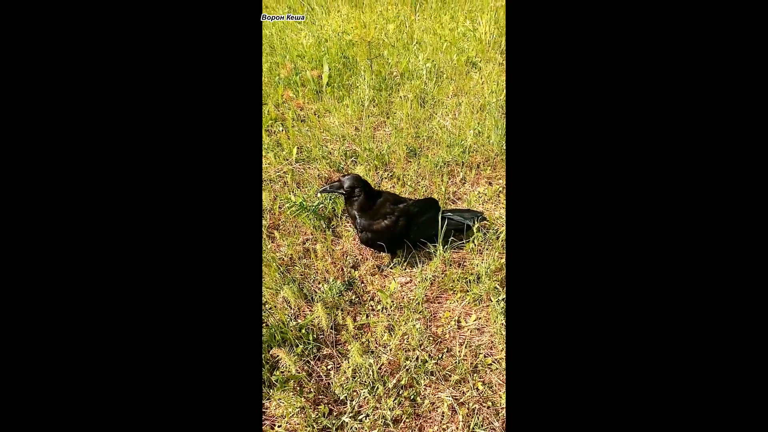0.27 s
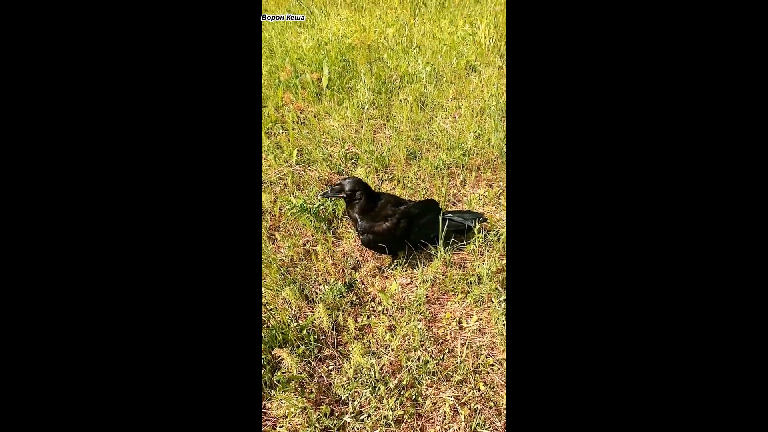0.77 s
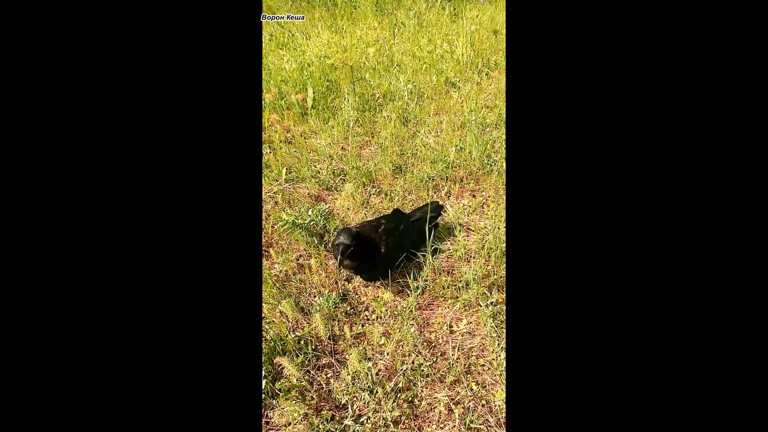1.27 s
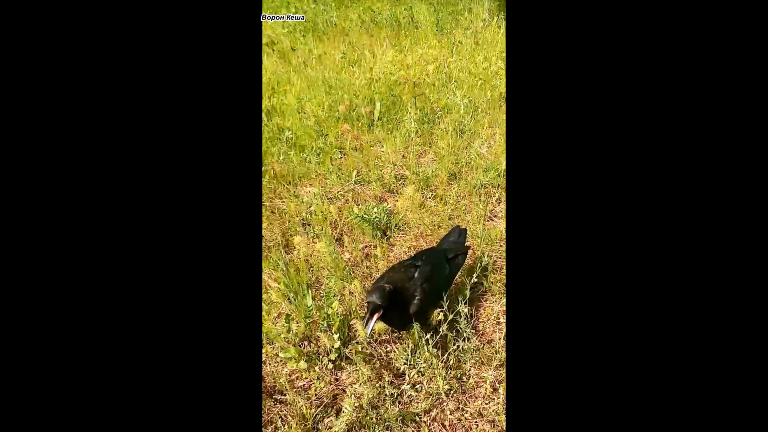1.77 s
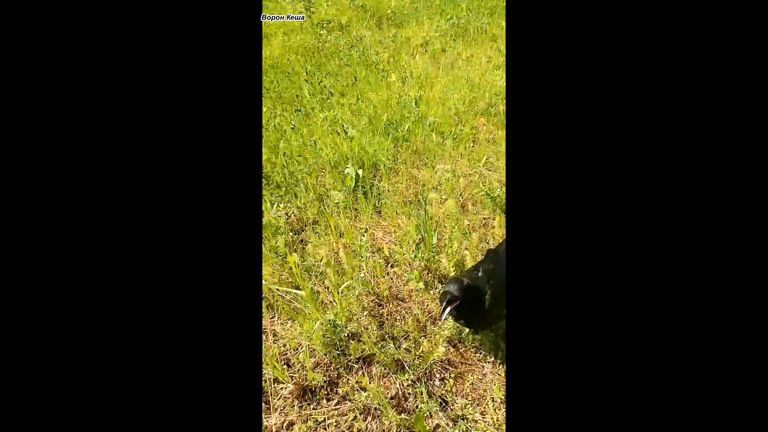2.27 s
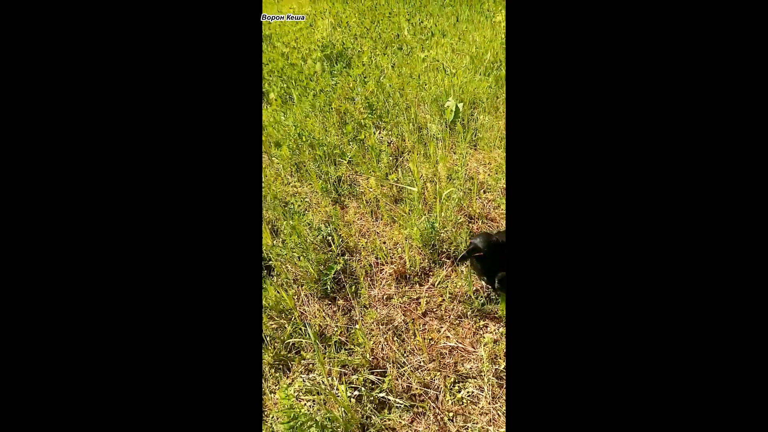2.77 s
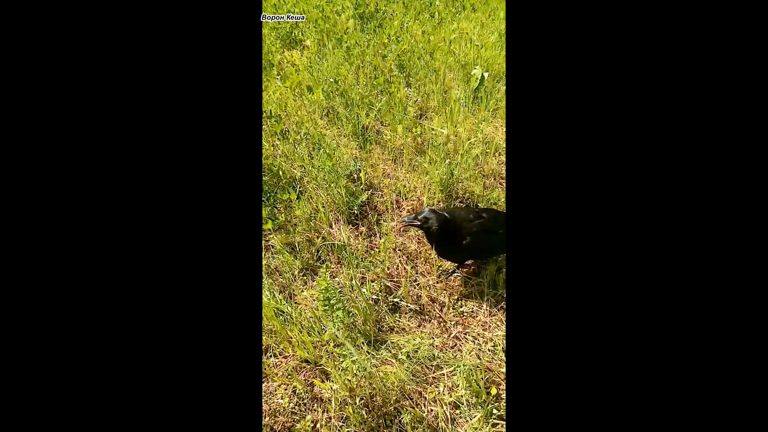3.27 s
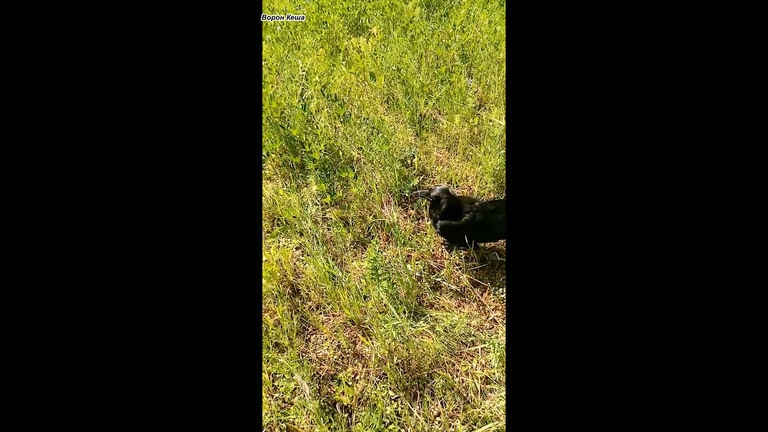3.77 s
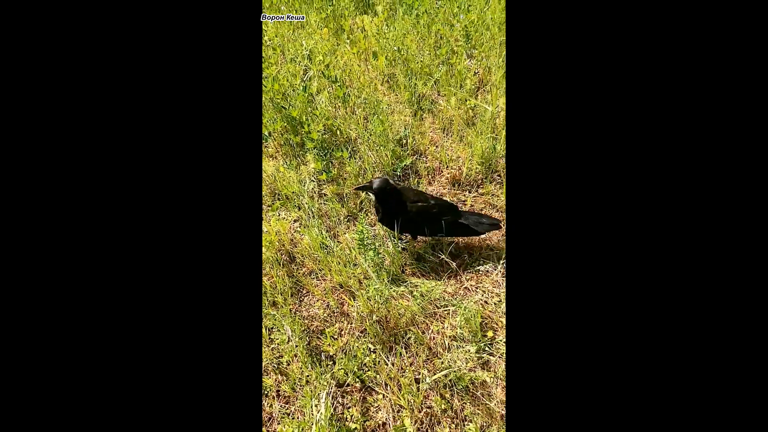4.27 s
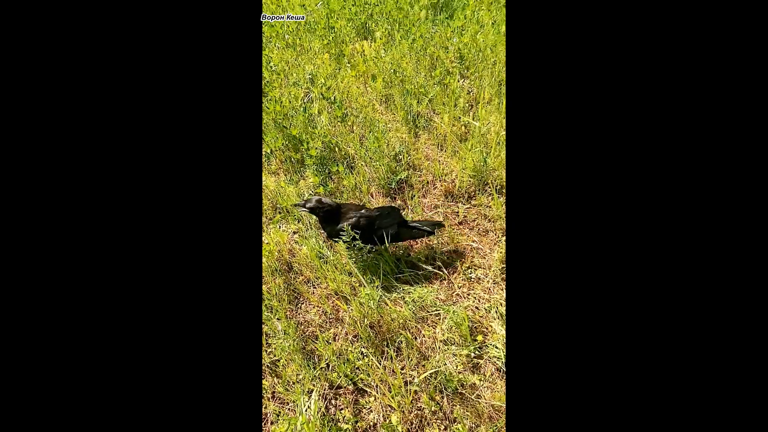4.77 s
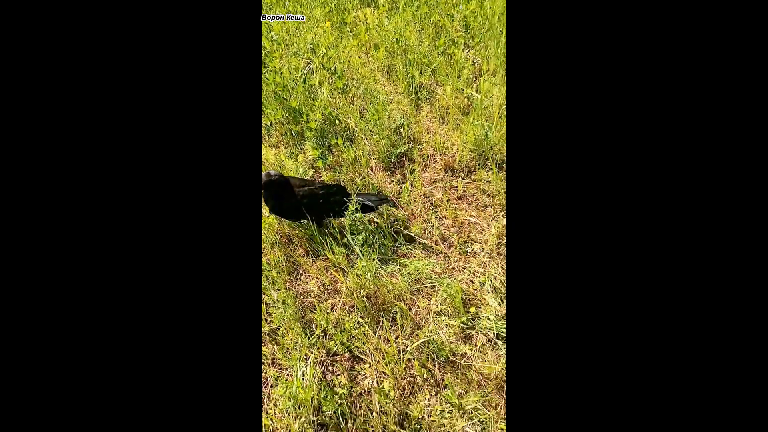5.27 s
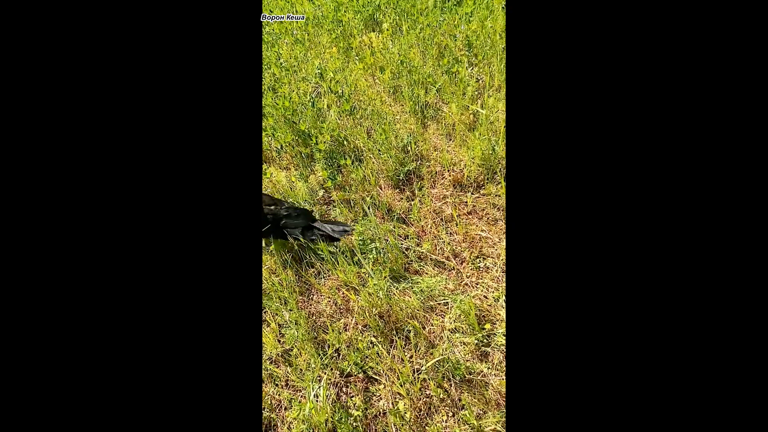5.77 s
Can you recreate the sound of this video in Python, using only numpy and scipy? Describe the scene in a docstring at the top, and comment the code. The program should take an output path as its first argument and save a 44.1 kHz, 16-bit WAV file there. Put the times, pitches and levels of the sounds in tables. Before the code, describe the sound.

A raven close to a small stereo microphone, mostly to the right, caws six times: four harsh calls at fairly even spacing, a longer gap, then a fifth and a final one. Each is a short, rough, fluttering tone that drops at the end. Dry grass hisses faintly between, stalks snap before the fifth call, and a distant small bird whistles thinly over quiet open air.

```python
"""A raven caws six times on a grassy clearing, close to a small stereo microphone and mostly to its right.
Each caw is a tone near 750 Hz that flutters about 60 times a second under a hoarse rasp and sags at its end.
Ground and grass scatter it, a near surface echoes it and the woods ring faintly, as decaying noise.
Dry grass hisses as shaped noise and snaps in short bright bursts; a small bird far off whistles as sines.
Behind them lie a low outdoor rumble and thin air, both of filtered noise."""
import sys
import numpy as np
from scipy import signal
from scipy.fft import rfft, irfft, next_fast_len
from scipy.io import wavfile
from scipy.ndimage import uniform_filter1d

SR = 44100
rng = np.random.default_rng(int(sys.argv[2]) if len(sys.argv) > 2 else 0)


def int16_out(signal):
    """Quantize to a 16-bit WAV file."""
    q = np.round(np.clip(np.atleast_2d(signal).T, -1, 1) * 32767)
    wavfile.write(sys.argv[1], SR, q.astype(np.int16))


N = 265437  # length in samples

# The six caws. Each row: start in seconds, length in seconds, time to the top of the pitch arch in seconds,
# release in seconds, top pitch in Hz, caw level in dB, fundamental and rasp relative to it in dB,
# roughness (0-1) after the attack and at the top, flutter strength as a factor,
# time before the end at which the voice breaks up in seconds.
CAWS = [(.613, 0.33, 0.24, 0.056, 750.7, -21.5, -5.5, -0.84, 0.69, 0.41, 1.1, .028),
        (1.368, 0.29, .19, 0.055, 776.3, -18.5, -12, -5, 0.76, 0.24, 1.05, 0.025),
        (2.1, 0.28, .15, 0.074, 758, -25, -8, 3.5, 0.68, 0.42, .85, 0.032),
        (2.772, 0.28, 0.17, .076, 766.4, -23.5, -8.5, 1.5, .92, 0.25, 1, 0.071),
        (4.423, 0.27, .13, 0.084, 746, -23.5, -7.5, -4.5, 0.92, .36, 1.5, 0.067),
        (5.87, 0.25, 0.15, .07, 733, -26, -5, -6, .85, .55, 0.94, 0.057)]
# Their flutter. Each row: time of a throb's crest in seconds, throbs per second at the start, middle and end,
# pitch swing as a factor, throb of the second harmonic in dB at full drive.
FLUTTERS = [(.640, 54.7, 67.2, 58, 0.067, 1), (1.397, 56.3, 62.9, 42.3, 0.098, 3),
            (2.133, 43.6, 63.13, 56, 0.17, 1.5), (2.805, 53.46, 63.8, 62.35, 0.12, 2),
            (4.451, 46.15, 63.83, 46.7, 0.086, 5), (5.896, 54.2, 60.15, 51.1, 0.087, 3)]
# How each caw meets the microphone. Each row: tilt of the rasp above 2 kHz in dB per octave, left relative
# to right in dB for the fundamental, the upper tones and the rasp, lag of the right port in ms.
POSES = [(1.5, -5, -2.5, -9, 0.986), (1.5, -3, -11.5, -8, 0.98), (2.5, -6, -6.5, -11, 0.898),
         (1.5, -6.5, -3.5, -10.5, 0.902), (-4.5, -6, -1, -8.5, 1.032), (-4, -3, 1.5, -8, 1.1)]
# Resonances of throat and open beak, one list a caw. Each entry: centre in Hz, boost in dB.
BEAKS = [
    [(1250, 14), (2200, 6), (2800, 11.5), (4300, 7), (4900, 9), (6650, 13.5)],
    [(1250, 9), (2250, 5.5), (2900, 6), (4450, 7), (6550, 8.5)],
    [(1620, 5.5), (2000, 8), (2750, 11), (3550, -12.5), (4000, 12), (4400, -0.5), (4850, 9.5)],
    [(1700, 12.5), (2870, 7), (3650, -1), (4300, 6), (4750, 7.5)],
    [(1900, -23), (3000, 6), (4250, 6.5), (6700, 1.5), (7800, 8.5)],
    [(2720, 10.5), (3100, 4.5), (4250, 4)],
]


def raven():
    """Six pushes of air through the syrinx, heard directly and by way of the clearing."""
    voice = np.zeros((2, N))
    for row, flutter, pose, beak in zip(CAWS, FLUTTERS, POSES, BEAKS):
        add(voice, *caw(row, flutter, pose, beak))
    return clearing(ports(voice))


# Spectrum of the rasp before tilt and beak. Each row: frequency in Hz, relative level in dB.
THROAT = [(250, -45.5), (500, -37.5), (700, -9.5), (1000, -23), (1400, -6.5), (1850, -1), (2250, 0.5),
          (2900, 0), (3500, 0), (4400, 1.5), (5500, -3.5), (7000, -3.5), (8200, -10), (9800, -13.5),
          (11500, -31), (13500, -29.5), (15200, -20)]
# The windpipe favours a harmonic near its resonance: centre, width, level of the third harmonic there.
PIPE_HZ, PIPE_OCTAVES, THIRD_DB = 1420, 0.23, 5.5


def caw(row, flutter, pose, beak):
    """The syrinx sings one tone; a slow flutter swings pitch and loudness together; turbulence adds the rasp."""
    start, length, top_s, release_s, top_hz, level_db, low_db, rasp_db, *harshness = row
    crest_s, *rates, swing, mid_throb_db = flutter
    tilt_db, low_pan_db, mid_pan_db, rasp_pan_db, lag_ms = pose
    t = np.arange(start, start + length, 1 / SR)
    count = len(t)
    arch, levels_db, rough, drive = gesture(t - start, length, top_s, release_s, *harshness)
    first_db, second_db, turbulence_db = levels_db
    rough = np.clip(rough, .02, .98)

    beats = np.cumsum(np.interp(t, np.linspace(t[0], t[-1], len(rates)), rates)) / SR
    beat = 2 * np.pi * (beats - np.interp(crest_s, t, beats))
    # the syrinx flips between a high, loud state and a low, soft one
    flip = np.tanh(1.8 * np.cos(beat))
    throb = drive * flip * (1 + .25 * wander(count, 49.3))

    # the rougher the voice, the wider its pitch swings and the more its cycles stray
    pitch_swing = swing * (.15 + 1.6 * rough) * throb
    stray = rough * (.018 * wander(count, 630) + .015 * wander(count, 150))
    phase = 2 * np.pi * np.cumsum(top_hz * arch * (1 + pitch_swing + stray)) / SR

    # under strong flutter the fundamental all but stops between throbs
    gate = 1 + np.clip(2.2 * drive - .3, 0, .88) * np.cos(beat)
    first = steady(gate ** 1.2) * hoarse(phase, .35 * rough ** 2, 140)
    burst_db = -1.5 * drive * np.cos(2 * beat)
    second = steady(amp(mid_throb_db * throb + burst_db)) * hoarse(2 * phase, .55 * rough ** 2, 175)
    # as the pitch sags, the third harmonic slides into the windpipe's resonance
    pipe = bump(3 * top_hz * arch, PIPE_HZ, PIPE_OCTAVES)
    third = amp(THIRD_DB) * pipe * hoarse(3 * phase, .5 * rough, 150)
    low = pan(low_pan_db) * amp(low_db + first_db) * first
    tone = low + pan(mid_pan_db) * amp(second_db) * (second + third)

    # sharp closures give the upper harmonics, spread a little in time; the highest are the least steady
    closures = np.zeros(count)
    for k in range(3, 21):
        unsteady = .36 * rough * (k - 2) * wander(count, 260)
        closures += np.cos(k * phase + .12 * k ** 2 + unsteady) / k ** 0.11
    closures *= amp(4 * rough * wander(count, 910))
    # each lets out a puff of turbulence, which the grass scatters differently to each side
    air = rng.standard_normal(count) + 1.86 * rng.standard_normal((2, count))
    puffs = (1 + np.cos(phase)) * air
    airy = rough ** 1.3
    rasp = ((1 - airy) * unit(closures) + airy * unit(puffs)) / np.hypot(1 - airy, airy)
    rasp *= amp(3 * rough * throb)
    rasp = colour(rasp, lambda f: read(THROAT, f) + tilt_db * np.log2(np.maximum(f, 2000) / 2000))
    for hz, boost_db in beak:
        rasp = ring(rasp, hz, boost_db)
    rasp = pan(rasp_pan_db) * amp(rasp_db + turbulence_db) * unit(rasp)

    left, right = amp(level_db) * (tone + rasp) * signal.windows.tukey(count, .04)
    lag = round(lag_ms * SR / 1000)
    return start, np.array([np.pad(left, (0, lag)), np.pad(right, (lag, 0))])


# The pitch arch starts and ends below the top by these shares, along curves of these powers.
PITCH_RISE, RISE_CURVE, PITCH_SAG, SAG_CURVE = .135, 1.4, .43, 2.2
# The attack: its length in seconds and the power of its curve.
ATTACK_S, ATTACK_CURVE = .025, 2.1
# Offset in dB that attack and release add at the ends, for the fundamental, the upper tones and the rasp.
ATTACK_DB, RELEASE_DB = (-7, -5, -14.5), (-16.5, -26, -27)
# Swell of the same three: crest as a share of the caw, offset in dB at the start.
SWELL_AT, SWELL_DB = (0.44, 0.55, 0.34), (-5, -10, -0.5)
# Flutter as a share of its strength at the start, at the top, and once it has faded this soon after the top.
FLUTTER_START, FLUTTER_TOP, FLUTTER_END, FLUTTER_FADE_S = 0.28, .68, 0.16, .1
# As the voice gives out it breaks up within this time in seconds, towards this roughness.
BREAK_S, ROUGH_END = .022, 1


def gesture(age, length, top_s, release_s, rough_start, rough_top, strength, break_s):
    """One push of air: pitch arches and sags, tones swell and fade, roughness moves to its top value, then breaks up."""
    rising = np.clip(1 - age / top_s, 0, 1)
    sagging = np.clip((age - top_s) / (length - top_s), 0, 1)
    arch = 1 - PITCH_RISE * rising ** RISE_CURVE - PITCH_SAG * sagging ** SAG_CURVE
    attack = np.clip(1 - (age / ATTACK_S) ** ATTACK_CURVE, 0, 1)
    release = np.clip(1 - (length - age) / release_s, 0, 1)
    levels_db = []
    for attack_db, swell_db, crest, release_db in zip(ATTACK_DB, SWELL_DB, SWELL_AT, RELEASE_DB):
        swell = swell_db * (age / (crest * length) - 1) ** 2
        levels_db.append(attack_db * attack + swell + release_db * release)
    rough = np.interp(age, [ATTACK_S, top_s, length - break_s, length - break_s + BREAK_S],
                      [rough_start, rough_top, rough_top, ROUGH_END])
    drive = strength * np.interp(age, [0, ATTACK_S, top_s, top_s + FLUTTER_FADE_S],
                                 [FLUTTER_START, 1, FLUTTER_TOP, FLUTTER_END])
    return arch, levels_db, rough, drive


def hoarse(phase, share, width_hz):
    """A partial of power 1 that breaks up into a band of noise as share nears 1."""
    a, b = wander(len(phase), width_hz), wander(len(phase), width_hz)
    clear = np.sqrt(2 * (1 - share)) * np.sin(phase)
    return clear + np.sqrt(share) * (a * np.sin(phase) + b * np.cos(phase))


def steady(swell):
    """Keeps the throbs of an envelope but holds its mean power over 50 ms at 1."""
    return swell / np.sqrt(uniform_filter1d(swell ** 2, size=2200))


def ring(x, hz, boost_db, width_hz=260):
    """Adds one resonance, or a dip where boost_db is negative."""
    return x + (amp(boost_db) - 1) * signal.lfilter(*signal.iirpeak(hz, hz / width_hz, SR), x)


# Extra shading of the left microphone port. Each row: frequency in Hz, gain in dB.
LEFT_PORT = [(400, 3.5), (780, 1), (1100, 2.5), (1500, 4), (2250, -1.5), (2800, 2), (3600, 3.5), (4600, 4),
             (6000, 5), (8000, -4), (9600, 8), (12000, -24.5)]


def ports(x):
    """The left microphone port colours the voice; the right one leaves it as it is."""
    return np.array([colour(x[0], lambda f: read(LEFT_PORT, f)), x[1]])


# Ring of the woods. Each row: frequency in Hz, relative level in dB.
WOODS = [(300, -9.5), (800, -19), (1150, -15.5), (1500, -7), (2000, -9.5), (3000, 6.5), (5000, -8),
         (9000, -26)]
# Its decay. Each row: frequency in Hz, time to fall by 60 dB in seconds.
WOODS_T60 = [(500, 1.2), (1500, 1.51), (3000, 0.3), (8000, 0.53)]


def clearing(x, scatter_s=.006, scatter_db=-11, echo_s=.008, echo_db=-16, woods_db=-34.5):
    """Ground and grass scatter the call at once, a nearby surface echoes it, and the woods ring on."""
    t = np.arange(SR) / SR
    near = rng.standard_normal((2, SR)) * np.exp(-t / scatter_s)
    near = colour(near, lambda f: -10 * np.log10(1 + (2000 / (f + 1)) ** 4))
    near *= amp(scatter_db) / np.linalg.norm(near[0])
    near[:, round(echo_s * SR)] += amp(echo_db)

    hz, age, z = signal.stft(rng.standard_normal((2, SR)), SR, nperseg=512)
    decay_db = read(WOODS, hz)[:, None] - 60 * age / read(WOODS_T60, hz)[:, None]
    z = z * amp(decay_db) * (1 - np.exp(-age / 0.044))  # the ring builds up gradually
    far = signal.istft(z, SR, nperseg=512)[1][:, :SR]
    # woods_db is the level at the strongest frequencies
    far *= amp(woods_db) / np.sqrt(uniform_filter1d(abs(rfft(far[0])) ** 2, size=300).max())
    return x + signal.fftconvolve(x, near + far, axes=1)[:, :N]


# Spectrum of the grass hiss. Each row: frequency in Hz, relative level in dB.
GRASS = [(180, -33.5), (300, -0.5), (354, -16.5), (462, -22.5), (1230, -9), (1580, -7.5), (2140, -10.5),
         (4370, -5.5), (5160, -7), (6740, -4.5), (13300, -20), (15000, -7), (16000, -4)]
# Course of the hiss. Each row: time in seconds, relative level in dB.
HISS = [(0, -77.5), (.6, -75), (.95, -59.5), (1.8, -60), (2.65, -57), (3.1, -57.5), (3.35, -63),
        (3.5, -57.5), (3.82, -57.5), (4.0, -68.5), (4.4, -66.5), (4.75, -59), (5.0, -68.5), (5.8, -68),
        (6.02, -62)]
# Soft swishes of stalks. Each row: centre in seconds, relative level in dB, length in seconds.
SWISHES = [(4.27, -66.5, .08), (4.905, -66.5, 0.076), (5.057, -68, 0.12), (5.191, -66.5, 0.17),
           (5.603, -62, 0.21), (5.785, -73, 0.27)]


def grass(hiss_db=2, grain_db=1.0, swish_hz=7000, right_db=4.0):
    """Rubbing stalks: a finely grained noise hiss with a few soft swishes, mostly on the right."""
    t = np.arange(N) / SR
    grain = grain_db * wander(N, 300) + .7 * wander(N, 20)
    hiss = noise(GRASS, 0.058) * amp(hiss_db + np.interp(t, *np.transpose(HISS)) + grain)
    strokes = np.zeros(N)
    for centre_s, db, length in SWISHES:
        strokes += amp(db) * np.exp(-(2 * (t - centre_s) / length) ** 2)
    swish = unit(colour(rng.standard_normal((2, N)), lambda f: 22 * bump(f, swish_hz, 0.29)))
    left, right = hiss + swish * strokes * amp(2.7 * wander(N, 153))
    return np.array([colour(left, lambda f: -4 - 20 * (f / 15000) ** 2), amp(right_db) * right])


# Dry stalks snapping. Each row: time in seconds, peak level in dB before panning, pitch in Hz.
SNAPS = [(3.794, -31.5, 8400), (3.8130, -28.5, 8100), (4.372, -53, 8800), (4.925, -48, 7780),
         (5.05, -49.5, 7600), (5.602, -39, 7000)]


def snaps(decay_s=0.0015, left_db=-9):
    """Each stalk cracks in a bright noise burst that flares and dies within milliseconds."""
    out, t = np.zeros((2, N)), np.arange(1024) / SR
    lead_s = .003  # the burst peaks this long after its first sample
    for s, db, hz in SNAPS:
        burst = rng.standard_normal((2, len(t))) * np.exp(-abs(t - lead_s) / decay_s)
        burst = colour(burst, lambda f: 14 * bump(f, hz, .2) + 12 * bump(f, 15300, .07) + 10 * bump(f, 5000, .8))
        add(out, s - lead_s, amp(db) * pan(left_db) * burst / abs(burst).max())
    return out


# A small bird far away. Each row: start in seconds, length in seconds, start and end pitch in Hz,
# relative level in dB.
CHIRPS = [(2.633, 0.12, 3240, 2850, -70), (4.34, .07, 2600, 2650, -75), (5.11, .2, 3692, 3860, -82),
          (5.3, .17, 4650, 4380, -82), (5.4, 0.15, 4780, 4740, -81), (5.726, 0.12, 3355, 3420, -80)]


def songbird(waver=0.011):
    """Thin whistled notes: gliding sines whose pitch wavers, fading in and out, mostly on the right."""
    out = np.zeros((2, N))
    for s, length, start_hz, end_hz, db in CHIRPS:
        count = round(length * SR)
        hz = np.linspace(start_hz, end_hz, count) * (1 + waver * wander(count, 200))
        whistle = 2 * np.hanning(count) * np.sin(2 * np.pi * np.cumsum(hz) / SR)
        add(out, s, pan(-10) * amp(db) * whistle)
    return out


# Spectrum of the low rumble. Each row: frequency in Hz, relative level in dB.
RUMBLE = [(15, -71), (25, -48), (51, 0.5), (75, -2.5), (141, 6), (249, -8), (362, -21.5), (397, -15.5),
          (498, -30), (600, -15.5), (780, -62.5), (1320, -120)]
# Course of the rumble. Each row: time in seconds, level in dB about which it heaves.
RUMBLE_DB = [(0, -67), (3.8, -67.5), (5.8, -70)]
# Spectrum of the thin air. Each row: frequency in Hz, relative level in dB.
AIR = [(240, -27.5), (400, -2.5), (536, -8), (579, -7), (777, -0.5), (949, -3.5), (1310, -15.5),
       (4510, -16), (16000, -45.5)]


def outdoors(air_db=-75.5, air_follow=0.26):
    """A low, gently heaving rumble, and thin air that stirs with the grass; both are filtered noise."""
    t = np.arange(N) / SR
    heave_db = np.interp(t, *np.transpose(RUMBLE_DB)) + 2.2 * wander(N, 6)
    rumble = pan(-7) * noise(RUMBLE, .82) * amp(heave_db)
    stir_db = np.interp(t, *np.transpose(HISS))
    air = pan(-5.0) * noise(AIR, 0.2) * amp(air_db + air_follow * (stir_db - stir_db.mean()))
    return rumble + air


def noise(spectrum, same):
    """A stereo pair of noises with the given spectrum, alike by the share same (0-1)."""
    a, b = rng.standard_normal((2, N))
    pair = np.array([a, same * a + np.sqrt(1 - same ** 2) * b])
    return unit(colour(pair, lambda f: read(spectrum, f)))


def wander(count, hz):
    """Smooth random motion of rms 1: noise rolled off above hz."""
    return unit(colour(rng.standard_normal(count), lambda f: -20 * np.log10(1 + (f / hz) ** 4)))


def colour(x, db_at):
    """Filters x by a gain in dB given as a function of frequency."""
    size = next_fast_len(x.shape[-1] + 2048)
    gain = amp(db_at(np.fft.rfftfreq(size, 1 / SR)))
    return irfft(rfft(x, size) * gain, size)[..., :x.shape[-1]]


def bump(hz, centre_hz, octaves):
    """A bell of height 1 on a logarithmic frequency scale."""
    return np.exp(-.5 * (np.log2((hz + 1) / centre_hz) / octaves) ** 2)


def read(points, hz):
    """Reads a table of frequency and value along a logarithmic frequency scale."""
    f, value = np.transpose(points)
    return np.interp(np.log(hz + 1), np.log(f + 1), value)


def pan(left_db):
    """Left and right gains of mean power 1, the left being left_db relative to the right."""
    return unit(np.array([[amp(left_db)], [1.]]))


def amp(db):
    """Amplitude factor of a level in dB."""
    return 10 ** (np.asarray(db) / 20)


def unit(x):
    """Scales x to rms 1."""
    return x / np.sqrt(np.mean(x ** 2) + 1e-20)


def add(mix, s, sound):
    """Adds a stereo sound to the mix from second s on."""
    part = mix[:, round(s * SR):][:, :sound.shape[1]]
    part += sound[:, :part.shape[1]]


def scene():
    """The raven in front, then grass and far bird, over the open air."""
    return raven() + grass() + snaps() + songbird() + outdoors()


def record(dry, cutoff_hz=15850):
    """The recorder's band limit: a steep low-pass."""
    lowpass = signal.firwin(511, cutoff_hz, window=("kaiser", 9), fs=SR)
    return signal.oaconvolve(dry, lowpass[None], "same")


dry = scene()
out = record(dry)
int16_out(out)
```